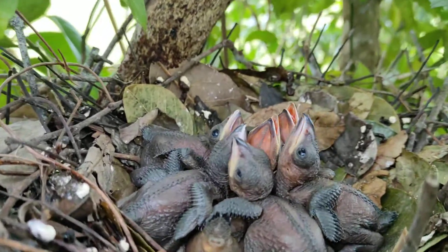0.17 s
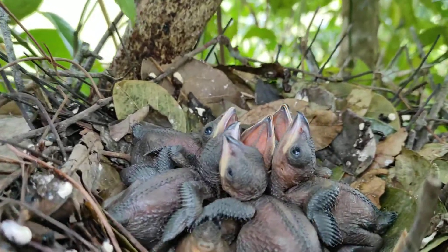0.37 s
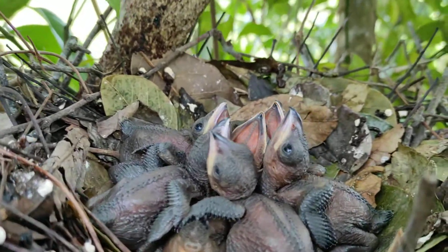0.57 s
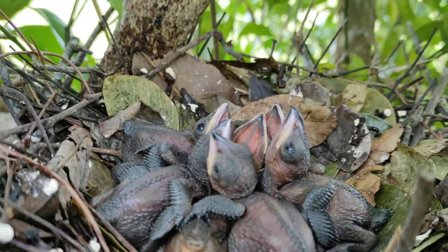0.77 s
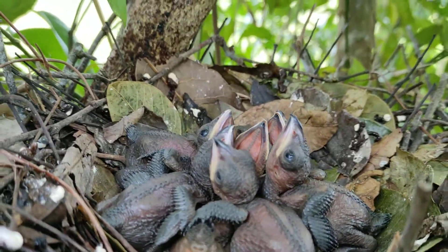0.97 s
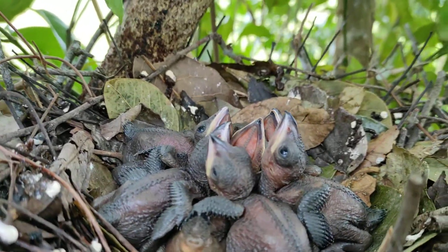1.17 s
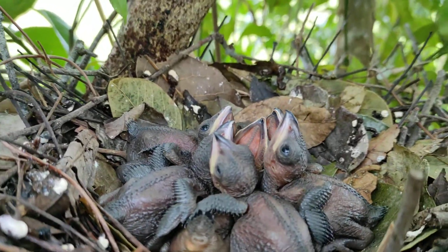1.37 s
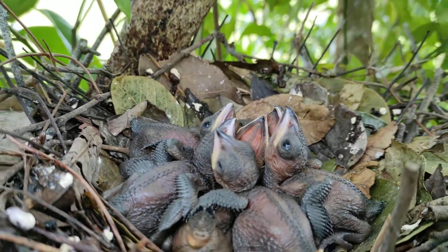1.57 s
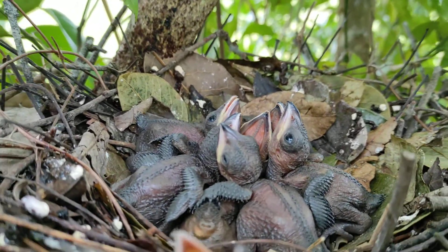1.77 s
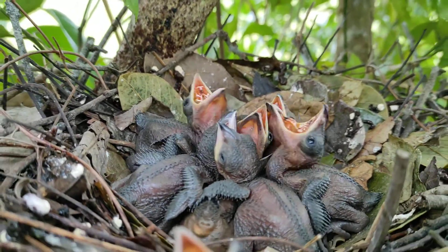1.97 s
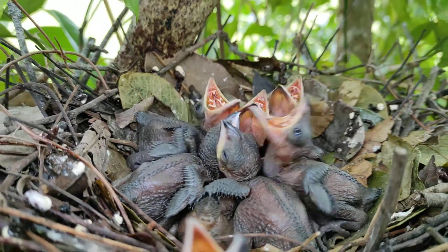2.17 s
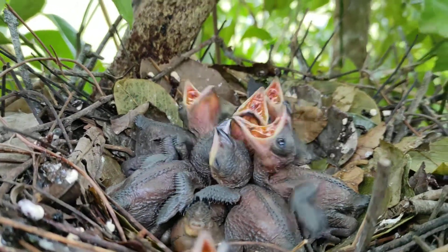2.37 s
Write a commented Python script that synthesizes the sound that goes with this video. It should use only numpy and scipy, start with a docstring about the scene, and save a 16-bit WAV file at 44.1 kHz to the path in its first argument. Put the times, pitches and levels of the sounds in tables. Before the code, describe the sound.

Nestling birds beg close by on the left, opening with a brief hoarse hiss. From 0.3 seconds twigs tick and the nest rustles and thumps softly. Faint squeaks at 0.7 seconds and two thin rising whistles lead into an arching, raspy call that ends at 1.6. A bump and more ticks follow, and the hiss returns louder at 2.1. High insect whine and low rumble continue throughout.

```python
"""A hoarse hiss from wide-open beaks, close and to the left: nestlings begging in a twig nest.
Soft squeaks and thin rising whistles lead into an arching, raspy call, and then the hiss returns.
Hiss, squeak and rasp are jittery harmonics and puffs of breath, coloured by throat and beak.
As the chicks shift, twigs tick and the nest thumps and rustles. Behind it all sits a bed of
steady, high insect whine and low rumble from the wood."""
import sys
import numpy as np
from scipy import signal
from scipy.fft import rfft, irfft, next_fast_len
from scipy.io import wavfile
from scipy.ndimage import uniform_filter1d, map_coordinates

SR = 44100
rng = np.random.default_rng(int(sys.argv[2]) if len(sys.argv) > 2 else 0)


def generate_wav(signal):
    """Clip the signal to [-1, 1] and save it as 16-bit WAV at the path in sys.argv[1]."""
    frames = np.transpose(np.atleast_2d(signal))
    scaled = np.clip(frames, -1, 1) * 32767
    pcm = np.round(scaled).astype(np.int16)
    wavfile.write(sys.argv[1], SR, pcm)


N = 107118

# hiss envelopes, one table each: t/s, level/dB
HISS_LEVELS = [
    [(0, -40), (.16, -40.5), (.215, -43.5), (.24, -57), (.27, -93)],
    [(2.115, -72), (2.14, -45), (2.165, -37.5), (2.19, -39.5), (2.215, -34.5), (2.33, -32.5), (2.43, -34.5)],
]
# pitches of the two hissing voices: f/Hz
HISS_PITCHES = [430.5, 589.8]
# throat and beak EQ for hiss, squeak and rasp: f/Hz, level/dB
WIDE_BEAK_EQ = [(350, -58), (600, -31), (788, -24.5), (940, -22), (1140, -15), (1300, -11.5), (1530, -11),
                (2040, -5.5), (2310, -9), (3070, -0.5), (4030, -10.5), (4620, -12.5), (5220, -12),
                (5590, -21), (6230, -17.5), (6760, -13.5), (8350, -3), (8750, -12), (9250, -11.5),
                (9650, -24), (11300, -22.5), (12300, -14), (13500, -64), (14100, -73), (15500, -83)]
SQUEAK_EQ = [(500, -6), (1000, -8), (1400, 5.5), (2000, 5.5), (3000, 10.5), (4000, 1.5), (5000, -12),
             (12000, -39)]
NARROW_BEAK_EQ = [(500, -46), (1100, -23), (1500, -11), (1850, -7.5), (2300, -15.5), (2600, -3),
                  (3100, 2.5), (3600, 0), (4400, -10.5), (5400, -3), (6300, -7.5), (6900, -3.5),
                  (7450, -14), (7950, -2.5), (8550, -12), (9000, 1.5), (9500, -5.5), (10300, -21.5),
                  (10800, -23.5), (12600, -22.5), (14000, -26), (15500, -52)]
# EQ of the bed's insects, rumble and air: f/Hz, level/dB
WHINE_EQ = [(4800, -44.5), (5800, -30), (6100, -26.5), (6450, -21.5), (6650, -7.5), (6750, -8), (6920, -6),
            (7050, -10), (7250, -15.5), (7420, -58), (8300, -60), (9500, -82)]
RUMBLE_EQ = [(20, 1.5), (40, 0.5), (100, -0.5), (175, 0), (260, -2.5), (340, -7), (470, -11), (700, -23.5),
             (1300, -44), (4000, -68)]
AIR_EQ = [(100, 12), (700, 9.5), (1400, 2.5), (3200, -40), (4700, -25), (8000, 10), (10000, -22),
          (13700, 7), (15500, -12.5)]
# envelopes of the rumble and the nest's rustle: t/s, level/dB
RUMBLE_LEVEL = [(0, -62), (.25, -53), (.36, -57), (.55, -54), (.75, -62.5), (1.6, -60.5), (1.72, -56.5),
                (1.85, -59.5), (2.08, -62), (2.43, -51)]
RUSTLE_LEVEL = [(0, -75), (.25, -45.5), (.3, -68.5), (.36, -46.5), (.4, -57.5), (.52, -52), (.56, -66),
                (.64, -65), (.72, -65), (1.6, -54.5), (1.68, -48), (1.75, -57), (1.82, -59.5), (1.97, -67),
                (2.05, -57.5), (2.1, -72), (2.43, -74)]
# EQ of dry leaves, a twig's snap and its woody knock: f/Hz, level/dB
RUSTLE_EQ = [(200, 2), (800, 1), (3100, 8), (4500, -1), (8200, 14.5), (10000, -6), (13500, -13),
             (15500, -51)]
SNAP_EQ = [(1000, -109), (4400, -7.5), (5800, 3), (6600, -7.5), (7900, 9.5), (9000, 1.5), (10000, -16.5),
           (13000, -27), (15500, -42)]
KNOCK_EQ = [(80, -74), (200, -3.5), (500, 0), (850, -7), (1500, -6), (3200, -0.5), (5000, -18.5),
            (9000, -28)]
# bodies bumping the nest: t/s, level/dB, base f/Hz, t60/s
BODY_THUMPS = [(0.014, -33, 174, 0.037), (0.063, -27, 373, 0.026), (0.075, -32.5, 117, 0.04),
               (0.334, -42.5, 205, 0.12), (0.342, -45.5, 160, 0.22), (0.502, -37.5, 567, 0.039),
               (1.663, -29, 218.6, 0.09), (1.715, -46.5, 161, 0.18)]
# nest resonances: ratio to the base frequency, level/dB
THUMP_MODES = [(.72, 1.5), (1.04, 1.5), (1.52, 0.5), (2.3, -19)]
# twig ticks: t/s, snap level/dB, knock level/dB, t60/s
TWIG_TICKS = [(0.259, -34.5, -40.5, 0.025), (0.327, -41, -29.5, 0.016), (0.3308, -14, -31, 0.013),
              (0.3335, -43, -27.5, 0.014), (0.344, -38.5, -44, 0.099), (0.411, -37, -41, 0.017),
              (0.439, -39, -47.5, 0.02), (.468, -55, -44, 0.024), (0.489, -40, -35, 0.018),
              (0.502, -33, -32, 0.03), (1.66, -25.5, -26.5, 0.022), (1.6651, -34, -28, 0.021),
              (1.717, -32.5, -35, 0.035), (1.775, -49, -47.5, 0.042), (2.046, -48.5, -55, 0.077)]
# taps on a springy twig: t/s, snap level/dB, knock level/dB, thud level/dB
TWIG_TAPS = [(.577, -26, -23.5, -28), (.6082, -12, -23.5, -28), (.6184, -38, -29, -28),
             (.6605, -35, -30, -28)]
# lead-in squeaks, one table each: t/s, f/Hz, relative level/dB
SQUEAK_SLIDES = [
    [(.68, 720, -66), (.72, 950, -57), (.75, 1140, -52.5), (.8, 1390, -52), (.85, 1630, -54)],
    [(.775, 600, -66), (.81, 820, -54), (.84, 1010, -53.5), (.875, 1120, -59), (.89, 1150, -70)],
]
# the two thin whistles: t/s, f/Hz, level/dB
HIGH_GLIDE = [(.81, 2950, -66), (.845, 3260, -45), (.865, 3370, -47), (.895, 3590, -37.5),
              (.965, 3670, -41.5), (1.01, 3800, -49), (1.09, 3920, -47), (1.29, 4110, -52)]
LOW_GLIDE = [(.83, 1530, -58), (.89, 1770, -53), (.95, 1910, -52), (1.004, 2035, -44), (1.07, 2140, -35),
             (1.14, 2215, -35.5), (1.175, 2260, -47), (1.275, 2400, -45), (1.3, 2300, -62)]
# arch of the raspy call: t/s, f/Hz, roughness (0-1)
RASP_ARCH = [(1.1, 560, .9), (1.19, 610, .65), (1.24, 712, .36), (1.29, 700, .48), (1.32, 655, .62),
             (1.37, 752, .23), (1.41, 778, .13), (1.445, 778, .14), (1.48, 748, .16), (1.52, 735, .28),
             (1.55, 700, .38), (1.58, 615, .5), (1.62, 540, .7)]
# its envelope: t/s, level/dB
RASP_SWELL = [(.9, -65), (.93, -46.5), (1.01, -45.5), (1.07, -43), (1.11, -39), (1.25, -35), (1.33, -35),
              (1.45, -33.5), (1.55, -35), (1.615, -39.5), (1.63, -66)]
# panning by frequency: f/Hz, level of left over right/dB
HISS_PAN = [(700, 14.5), (1300, 11), (3000, 24.5), (4600, 12), (6000, 9), (7500, 21.5), (10500, 10),
            (12300, 17)]
CALL_PAN = [(1400, 10), (2200, 4), (3100, 20), (4400, 11), (6200, 3.7), (8000, 8.8), (9200, 21),
            (10500, 0.64), (13000, 11)]
TWIG_PAN = [(60, 18), (200, 37), (700, 41), (2500, 33), (5000, 20), (8000, 30), (14000, 27)]
BED_PAN = [(60, 9), (250, 19.8), (1300, 4.2), (2400, 15), (4400, 1.7), (8000, 29), (14000, 10.3)]
# early reflections off the nest wall, left then right: delay/s, gain
WALL_REFLECTIONS = [(.0019, 0.41), (0.00128, 1)]

TOP_HZ = 15800
WHINE_DB, WHINE_PAN_DB, AIR_DB = -44.5, 4.5, -64.5
TAP_HZ, TAP_HALVING_S = 2430, 0.000733  # a thud's starting pitch; time to fall an octave from it
RASP_BRIGHTEN_DB_PER_S, RASP_TREBLE_HZ = 4.5, 7400


def amp(db):
    """Decibels to gain."""
    return 10 ** (np.asarray(db) / 20)


def unit(x):
    """Scale to rms 1."""
    return x / np.sqrt(np.mean(x ** 2) + 1e-20)


def along(points, hz):
    """Read (f/Hz, value) points on a log frequency axis."""
    f, v = np.transpose(points)
    return np.interp(np.log(hz + 1), np.log(f + 1), v)


def curves(rows):
    """One automation curve for each column after the time."""
    s, *cols = np.transpose(rows)
    return [np.interp(np.arange(N) / SR, s, c) for c in cols]


def gate(rows):
    """Open for the span of a table, with soft edges."""
    t = np.arange(N) / SR
    return uniform_filter1d(1. * ((t >= rows[0][0]) & (t <= rows[-1][0])), size=128)


def fade(s, t60, attack_s):
    """Envelope of a hit at time s."""
    t = np.maximum(np.arange(N) / SR - s, 0)
    return (1 - np.exp(-t / attack_s)) * np.exp(-np.log(1000) * t / t60)


def wobble(rate):
    """Smooth random modulation, rate knots a second."""
    return map_coordinates(rng.standard_normal(N), [np.arange(N) * rate / SR + 2])


def filtered(x, response):
    """x through a complex frequency response."""
    m = next_fast_len(N + 8192)
    return irfft(rfft(x, m) * response(np.fft.rfftfreq(m, 1 / SR)), m)[..., :N]


def coloured(x, eq):
    """x through an EQ curve, at rms 1."""
    return unit(filtered(x, lambda hz: amp(along(eq, hz))))


def noise(eq):
    """Coloured noise of rms 1."""
    return coloured(rng.standard_normal(N), eq)


def placed(left, right, pan, lag_s=0):
    """Pan left: the right side is softer, and the left trails it by lag_s."""
    right = filtered(right, lambda hz: amp(-along(pan, hz)) * np.exp(2j * np.pi * hz * lag_s))
    return np.array([left, right])


def cycle(hz, jitter, rate):
    """Phase of an unsteady oscillator."""
    return 2 * np.pi * np.cumsum(hz * (1 + jitter * wobble(rate))) / SR


def syrinx(hz, jitter, air, throat, flutter_db):
    """A chick's voice: jittery harmonics and puffs of air in step with them, through a throat."""
    phase = cycle(hz, jitter, rate=760)
    tone = 0
    for k in range(1, 29):
        partial = np.cos(k * phase + rng.uniform(0, 2 * np.pi))
        tone += partial * amp(2.5 * wobble(45.03)) * (k * hz < TOP_HZ)  # each wavers by itself
    puffs = unit(rng.standard_normal(N) * (1 + .5 * np.cos(phase)))
    source = np.sqrt(1 - air) * unit(tone) + np.sqrt(air) * puffs
    return coloured(source, throat) * amp(flutter_db * wobble(110))


def hisses():
    """Wide-open beaks: two voices overlap, so unsteady that they are nearly noise."""
    level = sum(amp(curves(rows)[0]) * gate(rows) for rows in HISS_LEVELS)
    voices = sum(syrinx(hz * (1 + .07 * wobble(30)), jitter=.06, air=.42,
                        throat=WIDE_BEAK_EQ, flutter_db=-1.4) for hz in HISS_PITCHES)
    x = level * unit(voices)
    return placed(x, x, HISS_PAN, lag_s=0.00013)


def wood():
    """The bed: a far chorus of insects whines evenly over low rumble and faint air."""
    whine = amp(WHINE_DB) * np.array([noise(WHINE_EQ), amp(-WHINE_PAN_DB) * noise(WHINE_EQ)])
    rumble_gain = amp(curves(RUMBLE_LEVEL)[0] + wobble(22))
    left, right = [rumble_gain * noise(RUMBLE_EQ) + amp(AIR_DB) * noise(AIR_EQ) for _ in range(2)]
    return whine + placed(left, right, BED_PAN)


def rustle():
    """Dry leaves in the nest: bright, grainy noise."""
    grains = rng.standard_normal(N) * amp(4.5 * wobble(350))
    return amp(curves(RUSTLE_LEVEL)[0]) * coloured(grains, RUSTLE_EQ)


def thump(s, db, hz, t60):
    """A body bumps the nest and its damped modes ring briefly."""
    t = np.arange(N) / SR - s
    ring = sum(amp(level) * np.sin(2 * np.pi * hz * ratio * t) for ratio, level in THUMP_MODES)
    return amp(db) * fade(s, t60, attack_s=0.0037) * ring


def twig_clicks():
    """Each tick or tap on a twig layers a bright snap with a woody knock."""
    tap_t60, attack_s = .006, 0.00056
    clicks = list(TWIG_TICKS) + [(s, snap, knock, tap_t60) for s, snap, knock, _ in TWIG_TAPS]
    snaps = sum(amp(db) * fade(s, t60, attack_s) for s, db, _, t60 in clicks)
    knocks = sum(amp(db) * fade(s, t60, attack_s) for s, _, db, t60 in clicks)
    return snaps * noise(SNAP_EQ) + knocks * noise(KNOCK_EQ)


def twig_thud(s):
    """A bending wave in a tapped twig: the highs arrive first, so the pitch dives."""
    t = np.maximum(np.arange(N) / SR - s, 0)
    phase = 2 * np.pi * TAP_HZ * TAP_HALVING_S * np.log1p(t / TAP_HALVING_S)
    return fade(s, t60=.02, attack_s=0.002) * np.sin(phase)


def squeak(rows):
    """A soft, scratchy upward slide of the voice."""
    hz, db = curves(rows)
    voice = syrinx(hz, jitter=.028, air=.12, throat=SQUEAK_EQ, flutter_db=1.5)
    x = amp(db - 1) * gate(rows) * voice
    return placed(x, x, CALL_PAN, lag_s=0.00036)


def whistle(rows, jitter):
    """A nearly pure rising tone with a slight burr, 10 dB louder on the left."""
    hz, db = curves(rows)
    burr_db = 1.3 * wobble(89.5) + .8 * wobble(450)
    x = amp(db + burr_db) * gate(rows) * unit(np.sin(cycle(hz, jitter, rate=1600)))
    return placed(x, x, [(1000, 10)], lag_s=0.00037)


def rasp():
    """A call that starts airy, turns reedy atop its arch and frays as it drops, ever brighter."""
    hz, rough = curves(RASP_ARCH)
    voice = syrinx(hz, jitter=.055 * (.1 + rough), air=.5 * rough, throat=NARROW_BEAK_EQ, flutter_db=1.1)
    treble = filtered(voice, lambda f: 1 - 1 / (1 + (f / RASP_TREBLE_HZ) ** 10))
    from_middle_s = np.arange(N) / SR - np.mean([row[0] for row in RASP_ARCH])
    shelf_gain = amp(RASP_BRIGHTEN_DB_PER_S * from_middle_s)
    level = amp(curves(RASP_SWELL)[0]) * gate(RASP_SWELL)
    x = level * (voice + treble * (shelf_gain - 1))
    return placed(x, x, CALL_PAN, lag_s=0.0002556)


def nest_wall(x, sway):
    """A close reflection comb-filters the voices; the notches slide as the heads sway."""
    t = np.arange(N) / SR
    sides = []
    for side, (delay, gain) in zip(x, WALL_REFLECTIONS):
        moving_delay = delay * (1 + sway * wobble(9))
        sides.append(side + gain * map_coordinates(side, [SR * (t - moving_delay)]))
    return np.array(sides)


def foliage(x, wet_db, t60):
    """Leaves and branches scatter a short reverb tail."""
    tail = rng.standard_normal((2, SR // 4)) * fade(0.002, t60, attack_s=0.0048)[:SR // 4]
    wet = signal.fftconvolve(x, tail / np.linalg.norm(tail[0]), axes=1)[:, :N]
    return x + amp(wet_db) * wet


def scene():
    """The mix: chicks and nest up front, the wood behind."""
    whistles = whistle(LOW_GLIDE, jitter=0.021) + whistle(HIGH_GLIDE, jitter=0.014)
    voices = hisses() + rasp() + sum(squeak(rows) for rows in SQUEAK_SLIDES)
    chicks = nest_wall(voices, sway=0.099) + whistles
    twigs = twig_clicks() + sum(amp(db) * twig_thud(s) for s, _, _, db in TWIG_TAPS)
    movement = twigs + sum(thump(*row) for row in BODY_THUMPS) + rustle()
    nest = placed(movement, movement, TWIG_PAN, lag_s=.0001)
    return foliage(chicks + nest, wet_db=-13.0, t60=0.031) + wood()


def record(dry):
    """A brick-wall low-pass on the mix."""
    return filtered(dry, lambda hz: hz < TOP_HZ)


dry = scene()
out = record(dry)
generate_wav(out)
```